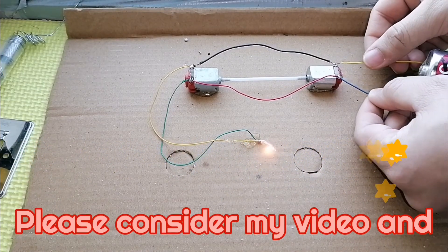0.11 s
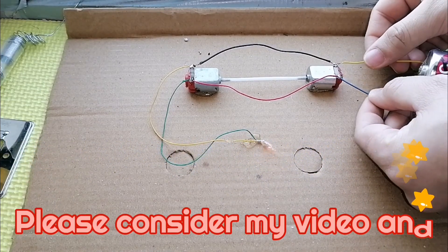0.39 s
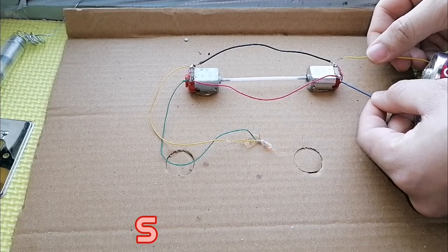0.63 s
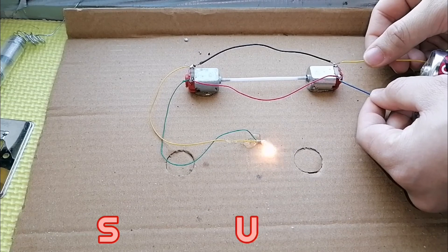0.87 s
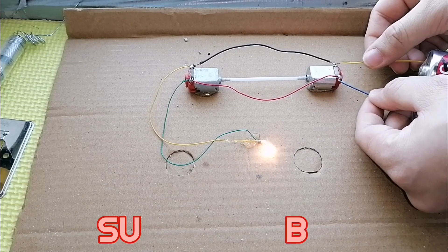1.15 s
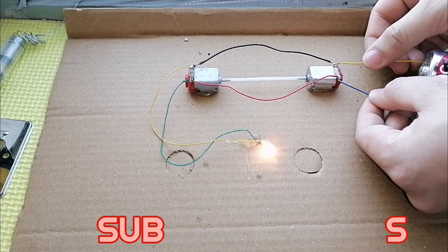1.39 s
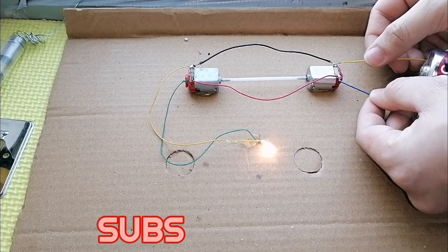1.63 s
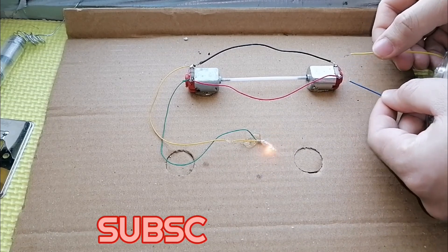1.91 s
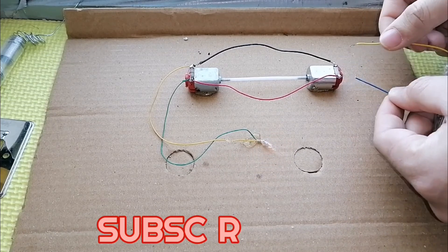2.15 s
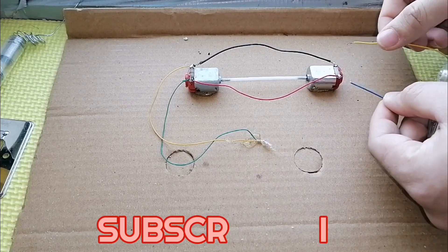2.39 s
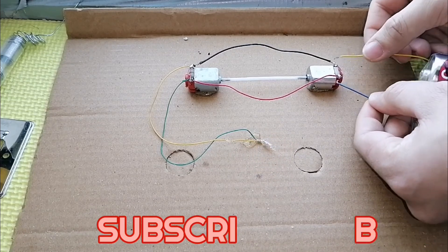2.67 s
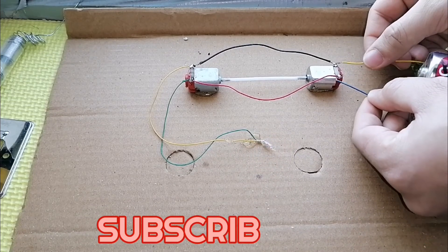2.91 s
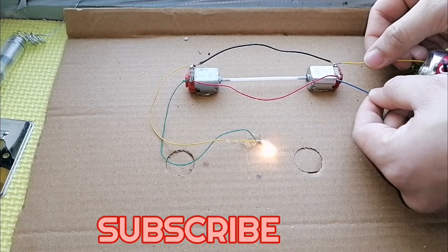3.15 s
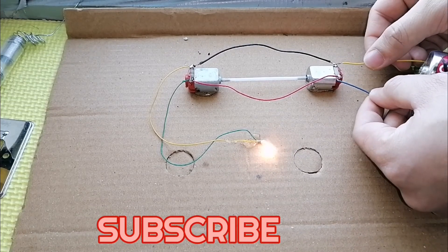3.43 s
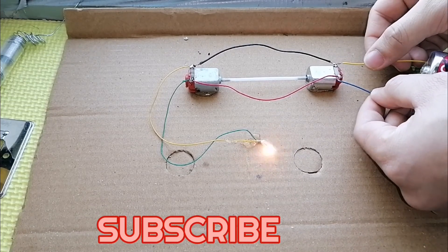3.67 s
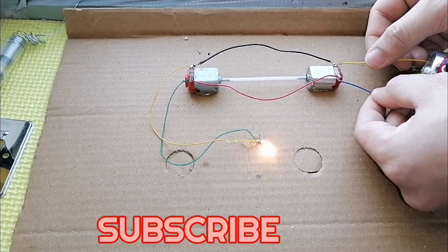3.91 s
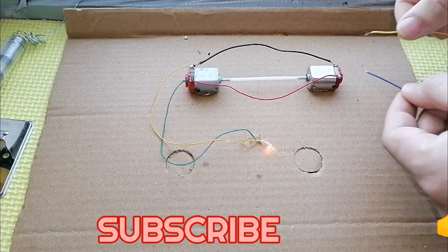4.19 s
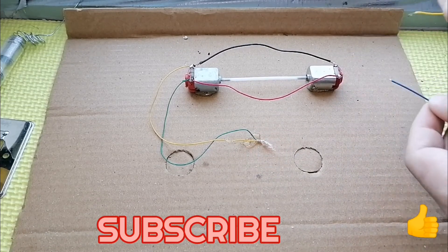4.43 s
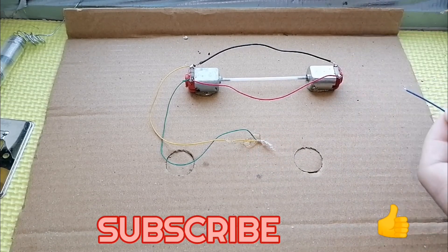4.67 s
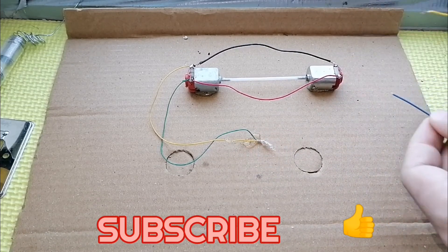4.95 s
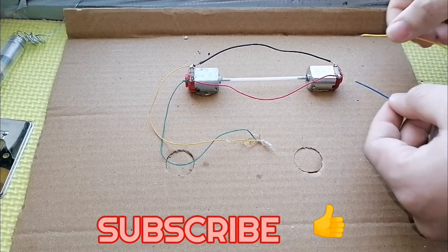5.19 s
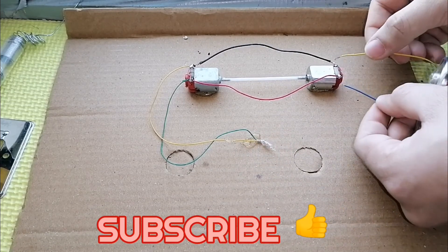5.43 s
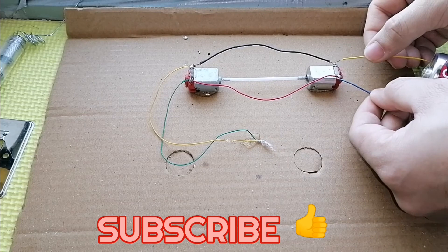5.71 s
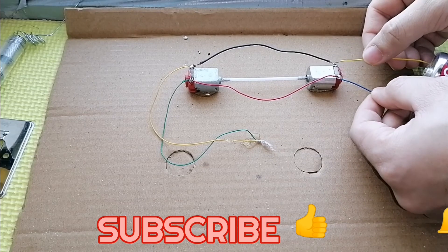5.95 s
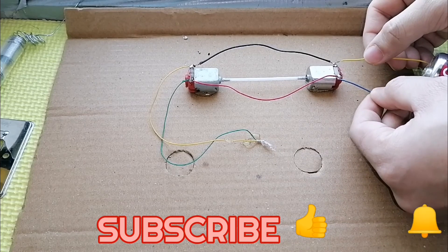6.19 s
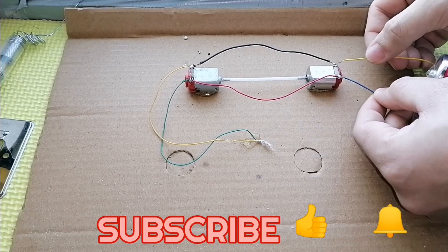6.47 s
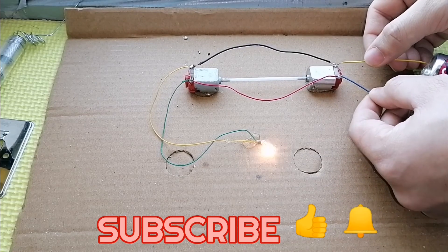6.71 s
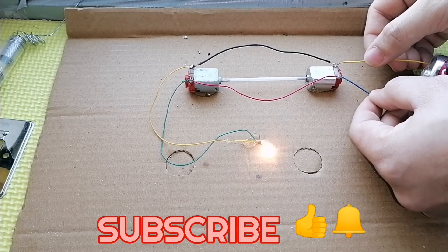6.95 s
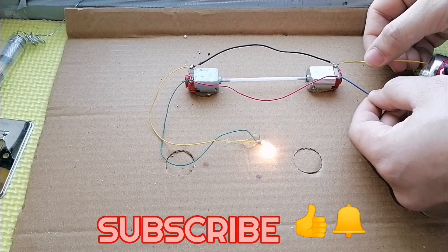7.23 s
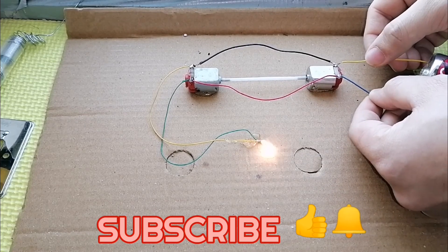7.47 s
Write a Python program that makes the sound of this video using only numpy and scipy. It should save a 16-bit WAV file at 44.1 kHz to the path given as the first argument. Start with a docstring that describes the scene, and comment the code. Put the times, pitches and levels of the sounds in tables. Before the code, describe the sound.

A pair of little brushed motors, fed by hand-held wires, spins up quickly into a raspy, nasal buzz with bright metallic hiss, holds, then sinks in pitch as it coasts. Three main spells follow a short uneven opening one. Between them are tiny ticks, soft skin rustle and low lumpy room noise. Close stereo microphone, small dry room.

```python
"""Two small three-pole motors, joined shaft to shaft on a cardboard tray, whine up, hold and coast in hand-fed spells.
Orders of the shaft speed and brush noise, which swells once a turn, excite the modes of tray and steel cans.
The wire ticks on a terminal as short noise bursts, and fingers rustle as grainy noise in strokes.
A quiet room adds its reverberation, low lumpy rumble, air noise and three far tones made by unsteady oscillators."""
import sys
import numpy as np
from scipy import signal
from scipy.fft import rfft, irfft, next_fast_len
from scipy.io import wavfile
from scipy.ndimage import uniform_filter1d, map_coordinates

SR = 44100
rng = np.random.default_rng(int(sys.argv[2]) if len(sys.argv) > 2 else 0)


def inscribe(sig):
    """Save sig as 16-bit PCM at rate SR to the path in sys.argv[1].

    A 1-D sig is mono; a 2-D sig holds one channel per row.
    Samples are clipped to [-1, 1] before scaling.
    """
    pcm = np.round(np.clip(np.atleast_2d(sig).T, -1, 1) * 32767)
    wavfile.write(sys.argv[1], SR, pcm.astype(np.int16))


def gain_from_db(level_db):
    """Convert decibel levels to linear amplitude factors (20 dB per decade)."""
    decades = np.asarray(level_db, float) / 20
    return 10 ** decades


N = 335142
T = np.arange(N) / SR  # t/s
# Source levels and spectra are relative: later gains shift them.

# wire feeding the motors; touching rows are one contact changing grip: [on t/s, off t/s, goal speed f/Hz, tray level/dB]
CONTACTS = [(.209, 0.222, 210.7, -5), (0.22, 0.273, 210.5, 2), (.275, 0.298, 211, -7.5),
            (0.296, .345, 211.7, -2.5), (.345, .367, 174.7, -4.5), (0.704, 0.736, 175, -6),
            (1.1, 1.113, 29.89, -4), (1.113, 1.431, 262.5, -0.5), (1.43, 1.6, 259.7, -3),
            (1.6, 1.71, 254, -2), (1.71, 1.765, 261, 0.5), (1.765, 1.891, 258, -1), (3.29, 3.317, 40, -5.5),
            (3.316, 3.76, 258.8, 0), (3.763, 3.886, 259.1, -1.5), (3.921, 4.155, 257.9, 0),
            (6.826, 6.899, 217.2, 0), (6.901, 7.542, 256.3, 2), (7.543, 7.7, 254.5, 1)]
FULL_SPEED_HZ = 257
SPIN_UP_S = 0.078  # time constant under current
FRICTION_HZ_PER_S, DRAG_PER_S = 221, 0.9  # coasting: steady brush friction, drag that grows with speed
GRIP_S, JOLT_DB, JOLT_S = 0.01, 0.5, 0.082  # smoothing of a contact change; jolt of the tray when current stops
FLUTTER_DB = 1.34  # the loose motors rock on the tray
# loudness with current on: [shaft speed f/Hz, tray level/dB, can level/dB, basic hiss-to-whine level/dB]
DRIVEN = [(0, -40.5, -63, 9), (50, -38, -41.5, 2), (116, -33, -37, 0.5), (168, -33, -34, -0.5),
          (221, -33.5, -33.5, -3), (257.4, -36, -31.5, -1)]
# loudness with current off: [shaft speed f/Hz, tray level/dB, can level/dB, basic hiss-to-whine level/dB]
COASTING = [(0, -82, -89, -6), (12.19, -62.5, -60, -5), (40, -54.5, -52.5, -13.5), (83.5, -50.5, -43.5, -6),
            (133.75, -42, -38, -5), (192, -39, -36, -1.5), (257.5, -33.5, -32, -2.5)]
SMOOTH_RIDE_DB, SMOOTH_WITHIN = -6, 0.07  # brushes hush near full speed, within this share of it
# push of the rotors while the speed glides: [multiple of shaft speed, level/dB]
FORCING = [(1, 10.5), (2, 4), (3, 6.5), (4, 6), (5, 4), (6, 4), (7, 5), (8, 3.5), (9, 6), (10, 3),
           (11, -0.5), (12, 1.5), (13, 0), (14, -0.5), (15, -0.5), (16, -8), (17, -4), (18, -1), (19, -4.5),
           (20, -5), (21, 2.5), (22, -16), (23, -2), (24, 2), (25, -2.5), (26, -1.5), (27, 2), (28, -1.5),
           (29, 2), (30, -17)]
# low orders at full speed, one list for each seat of the motors on the tray: [multiple, level/dB]
SEATS = [
    [(1, -5), (2, -15), (3, -3), (4, -8), (5, -1), (6, 0), (7, 0), (8, -5), (9, -2), (10, -4), (11, -13),
     (12, -16)],
    [(1, -10), (2, -21), (3, -5), (4, -21), (5, -7), (6, 0), (7, -2), (8, -11), (9, -1), (10, -6),
     (11, -19), (12, -18)],
    [(1, -14), (2, -19), (3, -3), (4, -7), (5, -2), (6, -1), (7, 0), (8, -1), (9, -3), (10, -5), (11, -14),
     (12, -15)],
    [(1, -15), (2, -18), (3, -5), (4, -4), (5, 0), (6, 0), (7, -15), (8, -5), (9, -10), (10, -12),
     (11, -11), (12, -19)],
]
# higher orders at full speed: [multiple, level/dB]
HELD = [(13, -26), (14, -26), (15, -27), (16, -30), (17, -27), (18, -14), (19, -25), (20, -16), (21, 0),
        (22, -10), (23, -22), (24, -13), (25, -10), (26, -8), (27, -13), (28, -16), (29, -23), (30, -13),
        (31, -21), (32, -14), (33, -15), (34, -15), (35, -12), (36, -5), (37, -4), (38, -6), (39, -4),
        (40, -7), (41, -16), (42, -19), (43, -19), (44, -16), (45, -5), (46, -11), (47, -16), (48, -18),
        (49, -21), (50, -21), (51, -17), (52, -22), (53, -14), (54, -16), (55, -10), (56, -5), (57, -5),
        (58, -5), (59, -10), (60, -10), (61, -16)]
# times at which the motors take a new seat: [t/s]
SHIFTS_S = [3, 3.9, 6]
RESONANCE_GAIN = 1.31  # stretch, in dB, of the body response felt by a gliding order
# cardboard resonances: [f/Hz, width f/Hz, level/dB]
TRAY = [(236, 214, -18.5), (594.5, 30, -6), (750, 41, -3.5), (949, 198, -8), (1201, 122, 1),
        (1543, 215, -1.5), (1779, 151, -1), (2032, 112, -1.5), (2314, 377, -9), (2684, 335, -7)]
# steel can resonances: [f/Hz, width f/Hz, level/dB]
CAN = [(4594, 144, -6.5), (5580, 476, -2.5), (6630, 106, 4), (6860, 250, -2), (8740, 610, 1),
       (9600, 310, 4), (9980, 490, 4), (11670, 290, -4.5), (12200, 500, -5.5), (13060, 640, -6),
       (14580, 610, 0)]
# colour of the motor sound between tray and can resonances: [f/Hz, level/dB]
BETWEEN_BODIES = [(2900, 6), (3400, 3.5), (3900, -2.5), (4400, -3), (5000, -1)]
# brush noise: [f/Hz, left-right correlation]
BRUSH_ALIKE = [(500, 0.3), (1500, 0.53), (3000, 0.073), (6000, 0.14), (9000, 0.74), (11500, 0.19),
               (14500, 0.77)]
# motor sound, left over right: [f/Hz, level/dB]
LEFT_DB = [(250, 2), (700, 3), (1030, -1), (1500, -6), (2400, -2), (4000, 0), (5300, 3), (8000, -1),
           (9300, 8), (10700, 5), (11600, 9), (12800, 1), (15500, 0)]
# motor sound, phase lead of the left: [f/Hz, phase/rad]
LEAD = [(300, .1), (700, .6), (1400, .8), (1750, 1.7), (2100, -1.3), (2700, 0), (3300, 2.2), (4300, 2.2),
        (4800, -1.3), (5300, -.7), (7000, -.5), (9000, 0), (11000, .6), (11700, 2.3), (12500, .6),
        (14000, 0)]
# wire contacts: [t/s, can blow level/dB, tray blow above it, before a common boost, level/dB]
TICKS = [(0.1442, -50.5, 16), (0.211, -45, 13), (0.2194, -49, 11), (0.6999, -36, 7), (1.1154, -37, -20),
         (3.2908, -38.5, 8), (3.3167, -35, 8), (5.0635, -47, -16), (5.168, -51, -3), (5.1993, -51, -3),
         (5.4248, -66, -9), (6.4388, -52, -13), (6.5844, -56, -19), (6.8259, -37, 1)]
# finger strokes: [t/s, hold t/s, level/dB]
RUSTLE = [(0.142, 0.056, -70), (2.885, .03, -70), (2.958, 0.11, -65.5), (5.29, 0.14, -72.5),
          (5.774, 0.044, -65.5)]
# colour of the rustle: [f/Hz, level per Hz/dB]
SKIN = [(710, -36), (1200, 1), (2130, -2), (3310, -2.5), (4150, -41), (4820, -3), (6120, -12), (8640, -1.5),
        (14700, -20), (15800, -29)]
STROKE_IN_S, STROKE_OUT_DB_PER_S = 0.018, 300
# reverberation: [f/Hz, time to fall 60 dB t/s]
ROOM = [(300, 0.031), (3000, 0.36), (12000, 0.033)]
# colour of the rumble: [f/Hz, level per Hz/dB]
LOW = [(12, -34), (20, -5.5), (43, 3), (57, -3), (75, -2.5), (133, -8.5), (170, -11), (220, -48),
       (370, -120)]
RUMBLE_DB, RUMBLE_LUMPS_DB = -58.5, 1
# swells of the rumble: [t/s, half width to 1/e t/s, level/dB]
SWELLS = [(.57, 0.049, -62), (1.18, 0.13, -55), (1.71, .04, -58), (2.01, 0.038, -61), (2.18, 0.027, -47.5),
          (2.47, 0.049, -53), (2.8, 0.22, -56.5), (3.09, 0.039, -52.5), (3.3, 0.054, -57),
          (3.83, 0.052, -59), (4.85, .05, -55), (5.05, .15, -51.5), (6.45, .04, -50.5)]
# colour of the air noise: [f/Hz, level per Hz/dB]
AIR = [(71, -31), (120, 0), (188, -1), (301, -10), (480, -4), (950, -8), (1150, -14.5), (2300, -21),
       (3200, -23.5), (4000, -34), (5500, -33), (8500, -31), (12000, -38), (14700, -34), (16000, -42)]
AIR_DB = -55.5
# rumble and air: [f/Hz, left-right correlation]
AIR_ALIKE = [(60, 0.65), (130, 1), (290, 0.37), (640, 0.19), (1410, -0.22), (3100, -0.068), (6820, 0.65),
             (15000, 1)]
# a far tone: [t/s, f/Hz, level/dB]
DRONE = [(4.5, 390.5, -67), (4.99, 395.8, -56.5), (5.23, 398, -61), (5.45, 399, -69)]
# a wavering hum: [t/s, f/Hz, level/dB]
HUM = [(0, 181.4, -62.5), (1.4, 186, -68.5), (4.0, 184.6, -70), (4.49, 183.5, -60.5), (4.97, 179.7, -73),
       (5.7, 183.9, -61), (5.95, 187.4, -56), (6.05, 187.3, -67), (7.6, 182.6, -67.5)]
# a faint sinking tone: [t/s, f/Hz, level/dB]
WHISTLE = [(4.9, 1975, -83), (5.8, 1918, -78.5), (6.8, 1896, -85)]
# microphone band limit: [f/Hz, level/dB]
MIC = [(15700, 0.5), (15950, -25), (16500, -70)]


def motors(slow_db=24):
    """Superposition: whine and brush noise share a radiated level set by shaft speed and current."""
    speed, fed, grip_db = shaft()

    def law(rows):
        hz, *columns = np.transpose(rows)
        return np.array([np.interp(speed, hz, column) for column in columns])

    tray_db, can_db, hiss_db = fed * law(DRIVEN) + (1 - fed) * law(COASTING)
    tray_db = tray_db + grip_db + FLUTTER_DB * wobble(14)
    angle = 2 * np.pi * np.cumsum(speed) / SR
    lack = 1 - np.clip(speed / FULL_SPEED_HZ, 0, 1)  # share of full speed missing
    hiss_db = hiss_db + SMOOTH_RIDE_DB * np.clip(1 - lack / SMOOTH_WITHIN, 0, 1)
    # slow shafts leave the cans to the brushes
    tray_hiss_db = hiss_db - 4.0 + 17 * lack ** 2
    can_hiss_db = hiss_db + 1.5 + slow_db * lack + 90 * lack ** 4
    hiss = gain_from_db([tray_hiss_db, can_hiss_db])[:, None]
    tray, can = (whine(speed, angle) + hiss * brushes(angle, lack)) / np.sqrt(1 + hiss ** 2)
    return (speed > 0) * (gain_from_db(tray_db) * tray + gain_from_db(can_db) * can)


def shaft():
    """Rotor dynamics: speed nears its goal exponentially under current, then friction and drag run it down."""
    drag_limit_hz = FRICTION_HZ_PER_S / DRAG_PER_S
    speed, fed, grip_db = np.zeros((3, N))
    for on, off, goal_hz, db in CONTACTS:
        a, b = round(on * SR), min(round(off * SR), N - 1)
        speed[a:b] = goal_hz + (speed[a] - goal_hz) * np.exp(-(T[a:b] - on) / SPIN_UP_S)
        since = T[b:] - T[b]
        coast = (speed[b - 1] + drag_limit_hz) * np.exp(-DRAG_PER_S * since) - drag_limit_hz
        speed[b:] = np.maximum(coast, 0)
        fed[a:b], fed[b:] = 1, 0
        grip_db[a:b], grip_db[b:] = db, JOLT_DB * np.exp(-since / JOLT_S)
    change = int(GRIP_S * SR)
    return speed, uniform_filter1d(fed, change), uniform_filter1d(grip_db, change)


def whine(speed, angle, drift_db=1.5, bead_db=3.5, pan_db=2, shake=0.005, high_db=-6, scatter=0.9):
    """Order excitation: gliding harmonics of the shaft cross the resonances; at full speed they hold a set pattern."""
    step = slice(0, N, 128)
    t, hz = T[step], speed[step]

    def body_db(f):
        response = np.abs(modes(TRAY)(f)) + gain_from_db(-10) * np.abs(modes(CAN)(f))
        return 20 * np.log10(response + 1e-4) + along(BETWEEN_BODIES, f)

    seat = np.digitize(t, SHIFTS_S)
    orders_db = np.array([low + HELD for low in SEATS])[:, :, 1].T
    forcing_db = dict(FORCING)
    settled = np.clip((hz - 232) / 18, 0, 1)  # 0 gliding, 1 near full speed
    angle = angle + shake * wobble(40)  # the coupling twists: high orders blur most
    out = np.zeros((2, 2, N))  # body, channel, time
    for k, full_db in enumerate(orders_db, 1):
        glide_db = forcing_db.get(k, high_db) + RESONANCE_GAIN * body_db(k * hz) - 12
        glide_db = glide_db + bead_db * wobble(25, t)
        held_db = full_db[seat] + body_db(k * hz) - body_db(k * FULL_SPEED_HZ)
        db = settled * held_db + (1 - settled) * glide_db + drift_db * wobble(7, t)
        pan = pan_db * wobble(1.9, t)  # each order drifts slowly and randomly between left and right
        wave = np.sin(k * angle + scatter * rng.normal())  # phases partly aligned: one knock a turn
        wave = wave * np.array([np.interp(T, t, gain_from_db(db + pan)), np.interp(T, t, gain_from_db(db - pan))])
        in_can = np.clip((k * speed - 3600) / 400, 0, 1)
        out[0] += (1 - in_can) * wave
        out[1] += in_can * wave
    power = uniform_filter1d((out ** 2).mean(axis=1), 2048, axis=1)
    return out / np.sqrt(np.abs(power[:, None]) + 1e-6)


def brushes(angle, lack, depth_db=-1.0, pole_db=5, spike_db=1, grit_db=3, knock_db=3.5):
    """Amplitude-modulated friction noise: one swell a turn; slow shafts add commutator gaps, grit and a tight spot."""
    turn = depth_db * (1 - lack) * np.cos(angle) + spike_db * wobble(900)
    gaps = pole_db * np.cos(3 * angle)
    tight_spot = knock_db * lack ** 3 * np.cos(angle)
    slow = lack * (gaps + grit_db * wobble(250) + tight_spot)
    gate = gain_from_db([turn + slow, turn + 0.088 * slow])  # tray, can
    gate = gate / np.sqrt(uniform_filter1d(gate ** 2, 4096, axis=1))
    tray, can = gate[:, None] * patchy(rng.standard_normal((2, 2, N)), depth_db=3.0)

    def radiate(noise, body):
        resonance = modes(body)
        # scraping hardly moves the lowest modes
        scrape = lambda f: gain_from_db(along(BETWEEN_BODIES, f)) / (1 + (700 / (f + 1)) ** 2)
        return spread(noise, BRUSH_ALIKE, lambda f: resonance(f) * scrape(f))

    return np.array([radiate(tray, TRAY), radiate(can, CAN)])


def patchy(x, depth_db):
    """Non-stationary noise: random louder and softer patches in the time-frequency plane."""
    z = signal.stft(x, nperseg=256)[2]
    field = uniform_filter1d(rng.standard_normal(z.shape[-2:]), size=5, axis=0)
    field = uniform_filter1d(field, size=12, axis=1)
    return signal.istft(z * gain_from_db(depth_db * unit(field)), nperseg=256)[1][..., :N]


def modes(table):
    """Modal superposition: a body's causal response is a sum of damped resonances of alternating sign."""
    def response(f):
        total = 0
        for k, (centre, width, db) in enumerate(table):
            damping = 1j * f * width
            total = total + (-1) ** k * gain_from_db(db) * damping / (centre * centre - f * f + damping)
        return total
    return response


def ticks():
    """Impact excitation: the wire touching a terminal drives can and tray with a few ms of decaying noise."""
    blows, t = np.zeros((2, N)), np.arange(400) / SR
    for s, db, tray_db in TICKS:
        crack = gain_from_db(-60 * t / 0.007) * rng.standard_normal((2, len(t)))
        blows[:, round(s * SR):][:, :len(t)] += gain_from_db([[db + tray_db + 10.0], [db]]) * crack
    return filtered(blows[0], modes(TRAY)) + filtered(blows[1], modes(CAN))


def fingers():
    """Sliding friction: skin and wire brush as grainy noise in strokes that swell, hold and fade."""
    stroke = np.zeros(N)
    for s, hold, db in RUSTLE:
        swell = np.clip((T - s) / STROKE_IN_S + 1, 0, 1)
        stroke += swell * gain_from_db(db - STROKE_OUT_DB_PER_S * np.maximum(T - s - hold, 0))
    grains = gain_from_db(1.9 * wobble(300)) * rng.standard_normal(N)
    return stroke * unit(filtered(grains, lambda hz: gain_from_db(along(SKIN, hz))))


def room(x):
    """Reverberation: tray rim and walls answer with a diffuse tail whose decay time depends on frequency."""
    hz, t, z = signal.stft(rng.standard_normal((2, SR // 4)), SR, nperseg=256)
    tail = signal.istft(z * gain_from_db(-60 * t / along(ROOM, hz)[:, None]), SR, nperseg=256)[1]
    delayed = np.pad(x, (60, 0))[None]
    return signal.fftconvolve(delayed, tail / np.linalg.norm(tail[0]), axes=1)[:, :N]


def background():
    """Ambient field: lumpy rumble, stronger on the left, with smooth air noise and far tones."""
    swell = gain_from_db(RUMBLE_DB + RUMBLE_LUMPS_DB * wobble(8))
    for s, width, db in SWELLS:
        swell = swell + gain_from_db(db) * np.exp(-((T - s) / width) ** 2)
    rumble = swell * gain_from_db([[3], [-0.8]]) * rush(LOW)
    air = gain_from_db(AIR_DB + 0.78 * wobble(3.4)) * rush(AIR)
    return rumble + air + tone(DRONE, 2.4, 0.73) + tone(HUM, 4.9, 1.23) + tone(WHISTLE, 2.5, 0.6)


def rush(spectrum):
    """Diffuse field: coloured stereo noise with a left-right correlation that depends on frequency."""
    return spread(rng.standard_normal((2, N)), AIR_ALIKE, lambda hz: gain_from_db(along(spectrum, hz)))


def tone(rows, waver_db, fuzz):
    """Phase integration: a far tone follows its frequency track, unsteady in level and phase (fuzz in rad)."""
    hz, db, on = curves(rows)
    phase = 2 * np.pi * np.cumsum(hz) / SR + fuzz * wobble(12)
    return on * np.sqrt(2) * gain_from_db(db + waver_db * wobble(11)) * np.sin(phase)


def curves(rows):
    """Linear interpolation of each column over time, and a faded switch that is on inside the table."""
    s, *cols = np.transpose(rows)
    on = np.interp(T, [s[0] - 0.003, s[0], s[-1], s[-1] + 0.01], [0, 1, 1, 0])
    return [np.interp(T, s, c) for c in cols] + [on]


def spread(pair, alike, response):
    """Mid-side mixing: two independent noises give a stereo pair of rms 1 with given correlation and colour."""
    def mid_side(hz):
        turn = np.arccos(np.clip(along(alike, hz), -1, 1)) / 2
        return response(hz) * np.array([np.cos(turn), np.sin(turn)])
    mid, side = filtered(pair, mid_side)
    return unit(np.array([mid + side, mid - side]))


def filtered(x, response):
    """Linear filtering: the spectrum of x times a complex response of frequency."""
    m = next_fast_len(N + SR // 4)
    return irfft(rfft(x, m) * response(np.fft.rfftfreq(m, 1 / SR)), m)[..., :N]


def along(points, hz):
    """Interpolation of (f/Hz, value) points on a logarithmic frequency axis."""
    f, v = np.transpose(points)
    return np.interp(np.log(hz + 1), np.log(f + 1), v)


def wobble(rate, t=T):
    """Random modulation: a smooth curve through normal random knots, rate of them a second."""
    return map_coordinates(rng.standard_normal(int(N / SR * rate) + 4), [t * rate])


def unit(x):
    """Normalisation to rms 1."""
    return x / np.sqrt(np.mean(x ** 2) + 1e-20)


def scene():
    """Direct and reverberant field: two microphones hear the tray from different sides, around an even centre."""
    near = motors() + ticks() + fingers()

    def sides(hz):
        half = gain_from_db(along(LEFT_DB, hz) / 2) * np.exp(0.5j * along(LEAD, hz))
        centre = np.abs(half + 1 / half) / 2
        return np.array([half, 1 / half]) / centre

    direct = filtered(near, sides)
    walls = gain_from_db(-17) * room(near.mean(axis=0))
    return gain_from_db(2.5) * direct + walls + background()


def roll_off(x):
    """The treble ends steeply here."""
    return signal.sosfilt(signal.butter(12, 16680, fs=SR, output="sos"), x)


def record(dry):
    """Compression: after the band limit, a mild gain control ducks the room under the motors."""
    x = filtered(dry, lambda hz: gain_from_db(along(MIC, hz)))
    power = np.abs(uniform_filter1d((x ** 2).mean(axis=0), 4096))
    gain = (1 + power / gain_from_db(-44) ** 2) ** -0.13
    return roll_off(gain * x)


dry = scene()
out = record(dry)
inscribe(out)
```